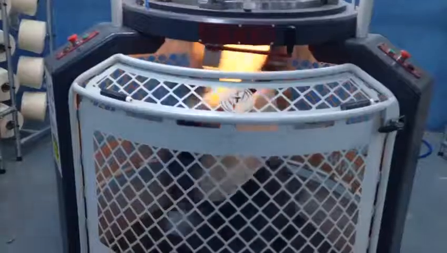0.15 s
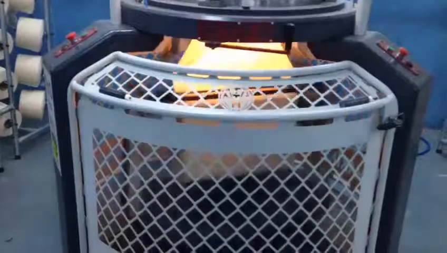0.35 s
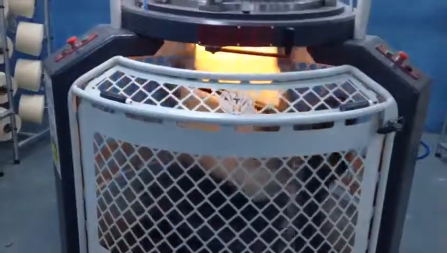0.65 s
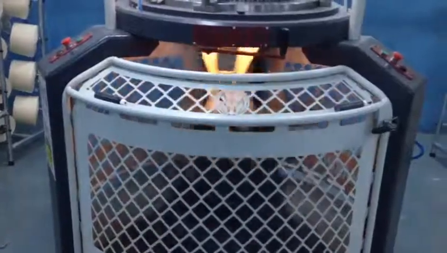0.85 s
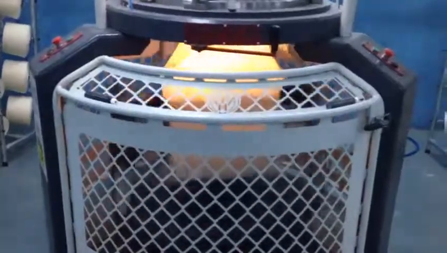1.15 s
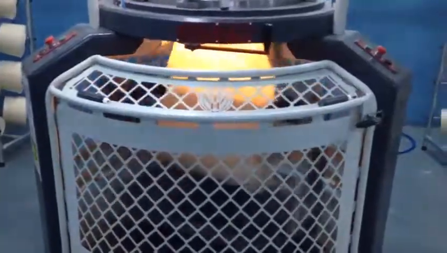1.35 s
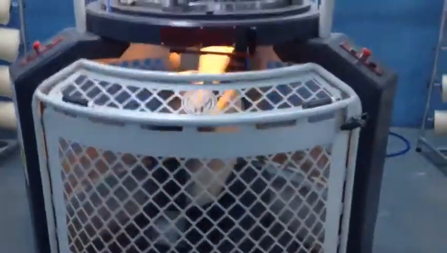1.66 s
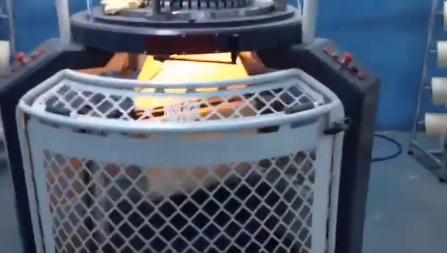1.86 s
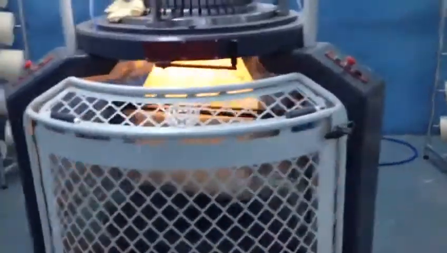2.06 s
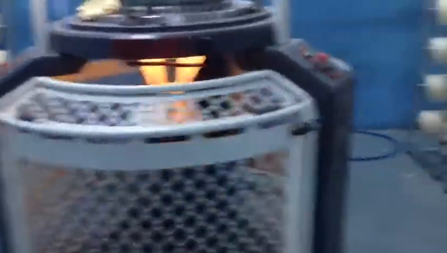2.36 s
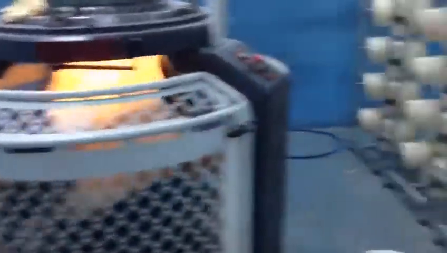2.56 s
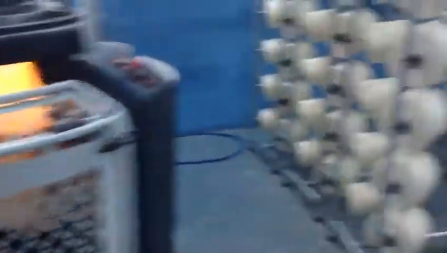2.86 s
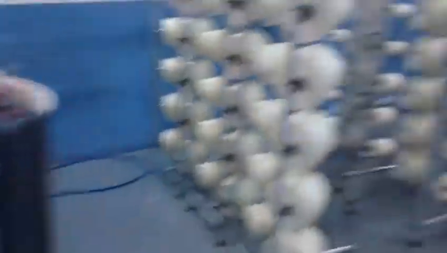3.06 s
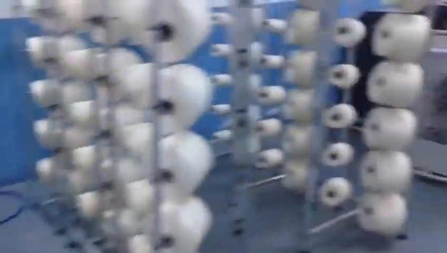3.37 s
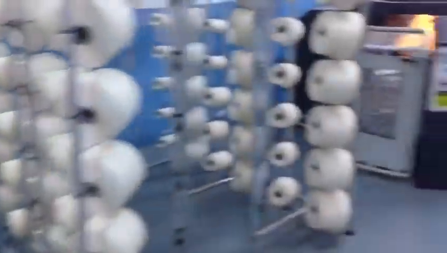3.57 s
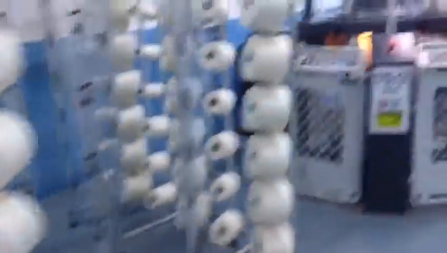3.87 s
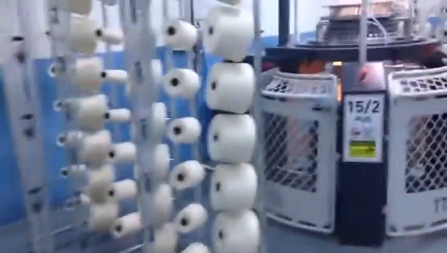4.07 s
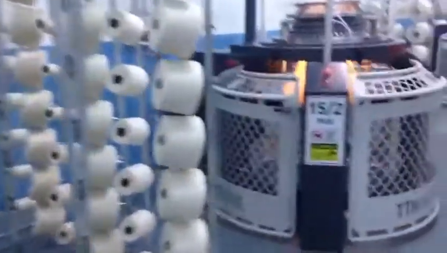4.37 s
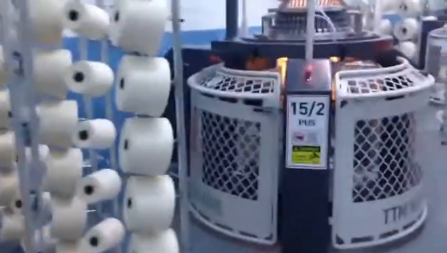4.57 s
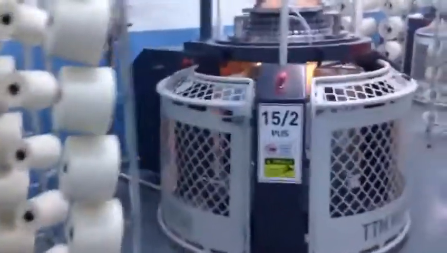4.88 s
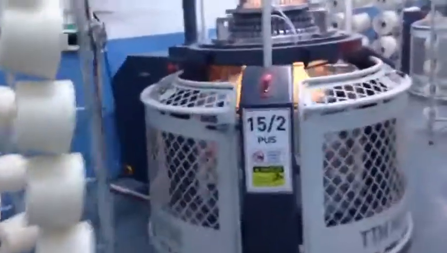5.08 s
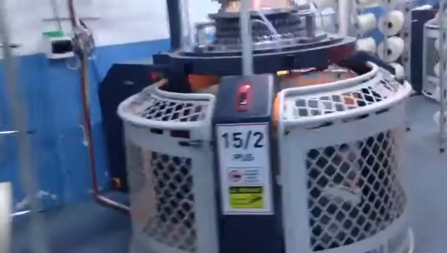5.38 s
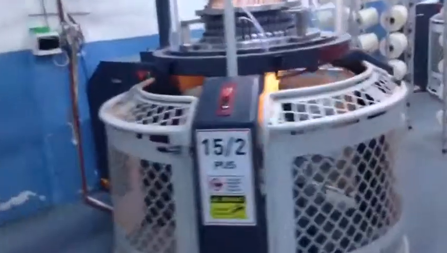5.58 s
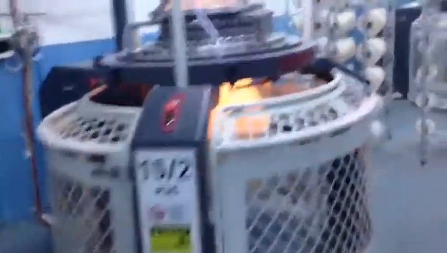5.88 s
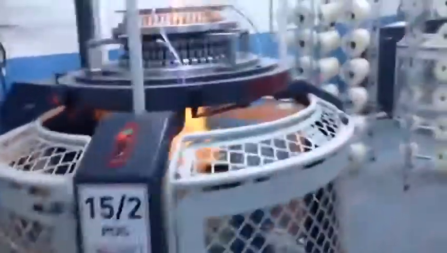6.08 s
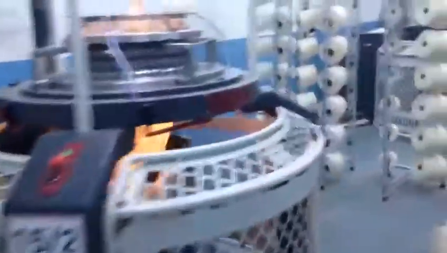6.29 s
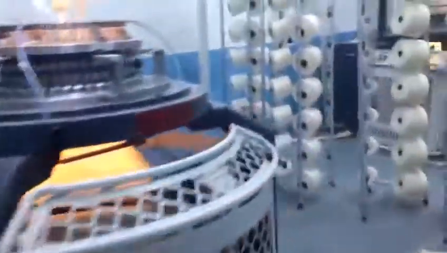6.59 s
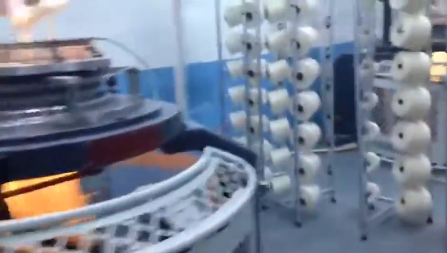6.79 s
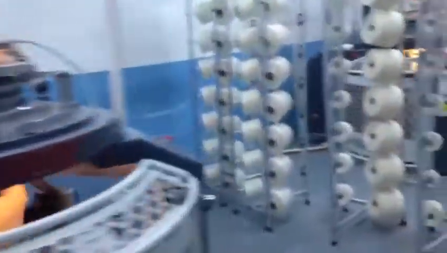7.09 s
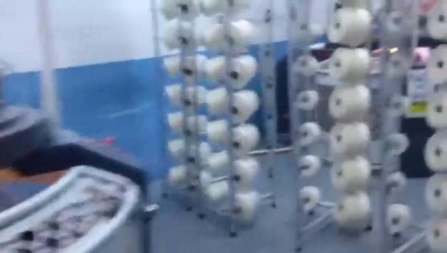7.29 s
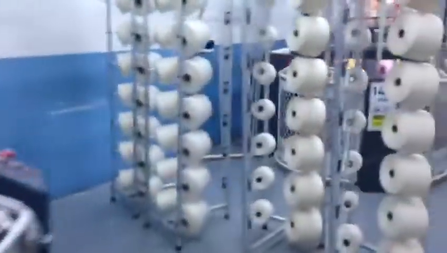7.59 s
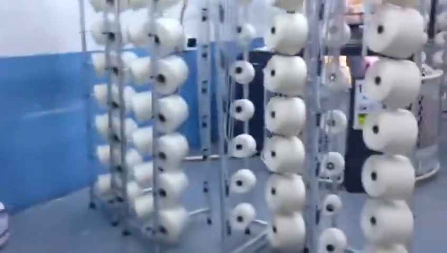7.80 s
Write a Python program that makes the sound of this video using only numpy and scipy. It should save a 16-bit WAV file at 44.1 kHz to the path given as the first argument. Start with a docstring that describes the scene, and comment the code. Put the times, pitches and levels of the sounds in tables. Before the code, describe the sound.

Circular knitting machines run throughout about eight seconds in a large, echoing factory hall, heard from a microphone carried past them. From the start there is a dense, steady roar with a fine, grainy needle rattle and a high hiss, brightest in the first second. Low motor and fan hums swell and sink as the position changes. A mid-pitched gear whine throbs about seven times a second, mixed with wavering tones from the needles, and faint steel pings are scattered through the noise. A nearby air valve gives short, sharp hissing puffs about five times a second, clearest until about 3 seconds, weaker by 5 seconds and then sinking into the background. The low rumble builds gradually. From about 6.5 seconds the hum and whine are a little stronger, and the machines keep running to the end.

```python
"""Circular knitting machines run in a large hall while a phone is carried past them.
Their needles rattle over the cams that lift them and sing at the rate they pass. Motors and fans hum,
drive gears whine and loose steel parts ping. An air valve on the first machine puffs five times
a second, fading as the walker moves on. The sound is mono and sets in after a tenth of a second."""
import sys
import numpy as np
from scipy import signal
from scipy.fft import rfft, irfft, next_fast_len
from scipy.io import wavfile
from scipy.ndimage import uniform_filter1d, map_coordinates

SR = 44100
rng = np.random.default_rng(int(sys.argv[2]) if len(sys.argv) > 2 else 0)


def master(y):
    """Save y as 16-bit WAV."""
    cut = np.clip(np.atleast_2d(y).T, -1, 1)
    pcm = np.round(cut * 32767)  # scale
    wavfile.write(sys.argv[1], SR, pcm.astype(np.int16))


N = 349829
TIME = np.arange(N) / SR

# The needle beds as the walker passes. Each row: time in seconds, rattle in dB, air hiss in dB.
NEEDLE_BED_LEVELS = [(0.1, -25, -28.5), (0.45, -26, -28.5), (0.68, -26.5, -28), (0.88, -28, -30.5),
                     (1.2, -27.5, -30.5), (1.5, -27.5, -30), (2.3, -28.5, -31.5), (2.9, -27.5, -30),
                     (3.45, -28, -29.5), (3.9, -28.5, -33.5), (4.2, -28.5, -33.5), (4.45, -28, -31),
                     (4.95, -29, -33.5), (5.4, -29.0, -32), (5.85, -29, -32.5), (6.6, -29.0, -33.5),
                     (7.3, -28, -33.5), (7.93, -28, -33.5)]
# The hall's five noises, from low to high. Each row: frequency in Hz, relative level in dB.
RUMBLE_SPECTRUM = [(12, -71), (25, -47), (40, -23), (62, -13), (103, -10), (156, -4), (200, -6.5),
                   (248, -16), (280, -13), (360, -27), (620, -120)]
ROAR_SPECTRUM = [(140, -14.5), (240, -3), (306, 0.5), (371, 2), (446, 0.5), (506, -0.9), (715, -1.5),
                 (899, -2), (982, -4), (1400, -16.5), (1820, -48), (3080, -120)]
CLATTER_SPECTRUM = [(800, -36), (1100, -1), (1250, -1), (1500, -1), (2000, -0.5), (2400, -1), (2650, -0.5),
                    (2900, -2), (3300, -8), (4000, -45)]
RATTLE_SPECTRUM = [(2400, -52), (3000, -3), (3300, -1.5), (3700, 0), (4200, 0.5), (4800, -1.5),
                   (5500, -6.5), (6200, -13), (7500, -23.5)]
HISS_SPECTRUM = [(4200, -26), (5300, -1.5), (5900, 0), (7300, -3), (8500, -4.5), (9500, -5), (9800, -7),
                 (10500, -9.5), (11200, -21)]
# A dip near 2800 Hz, deepest beside the first machine. Each row: time in seconds, depth from 0 to 1.
DIP_DEPTHS = [(.1, 0.15), (.5, 0.28), (2.5, 0.34), (3.2, 0.04), (7.93, 0.16)]

# The strong hums' pitches in Hz. Two motors at nearly the same speed give the close pairs.
HUM_PITCHES = [152.3, 168.1, 209.9, 300.4, 304, 451.2, 456]
# The hums in the hall's standing waves. Each row: time in seconds, then a level in dB for each pitch.
HUM_LEVELS = [(0.1, -42, -40, -52, -50, -44, -42, -52), (0.3, -33, -44, -52, -45, -38, -37, -52),
              (0.49, -37, -34, -46, -42, -52, -46, -52), (0.69, -52, -37.5, -35, -39, -47, -36, -52),
              (0.88, -39, -37, -44, -40, -42, -40, -52), (1.08, -39, -42, -45, -42, -43, -48, -54),
              (1.27, -45, -40, -40, -37, -43, -52, -48), (1.47, -43, -46, -52, -35, -46, -38, -52),
              (1.67, -52, -51, -38, -38, -46, -34, -52), (1.86, -52, -52, -42, -40, -43, -32.5, -41),
              (2.06, -44, -42, -52, -40, -52, -41, -52), (2.25, -52, -43, -45, -51, -38, -45, -35),
              (2.45, -47, -34.5, -52, -49, -41, -46, -35), (2.64, -52, -36, -52, -44, -38, -38, -35),
              (2.84, -39, -38, -52, -38, -39, -33, -35), (3.04, -45, -40, -52, -52, -52, -33, -52),
              (3.23, -42, -38, -52, -52, -52, -31, -42), (3.43, -35, -40, -37, -48, -41, -31.5, -36),
              (3.62, -37, -37, -43, -36, -34, -41, -52), (3.82, -41, -33, -40, -41, -42, -40, -52),
              (4.01, -46, -35, -37, -35, -52, -32.5, -43), (4.21, -39, -29, -36, -39, -52, -35, -44),
              (4.41, -33, -32, -41, -38, -44, -46, -47), (4.6, -34, -38, -47, -41, -45, -40, -36),
              (4.8, -39, -37, -39, -43, -52, -50, -41), (4.99, -33, -37, -52, -52, -48, -37, -42),
              (5.19, -43, -52, -39, -43, -44, -38, -36), (5.39, -40, -37, -42, -40, -52, -52, -37),
              (5.58, -43, -37, -34, -52, -42, -39, -47), (5.78, -37, -37, -38, -41, -49, -38, -46),
              (5.97, -40, -43, -36, -52, -52, -41, -40), (6.17, -37, -40, -43, -52, -52, -52, -38),
              (6.36, -40, -52, -32.5, -37, -43, -49, -51), (6.56, -52, -52, -30.5, -32.5, -42, -45, -36),
              (6.76, -43, -43, -31, -37, -40, -52, -41), (6.95, -52, -52, -31, -34, -39, -39, -52),
              (7.15, -33, -38, -30.5, -52, -49, -37, -47), (7.34, -37, -38, -32.5, -39, -45, -37, -52),
              (7.54, -31, -32, -31.5, -42, -34, -31.5, -42), (7.73, -29, -31, -32.5, -52, -52, -34.5, -42),
              (7.93, -33, -30, -34, -52, -43, -41, -44)]
# The weaker hums. Each row: pitch in Hz, level in dB.
QUIET_HUMS = [(71.3, -54), (99.6, -44.5), (139, -45.5), (186, -43.5), (260, -50.5), (311, -44),
              (336.5, -42.5), (412, -41), (467, -42), (521, -46), (608, -45.5), (955, -60), (1005, -46)]

# Needle and gear tones. Each row: time in seconds, then levels in dB for three machines' needles,
# the main gear tone and the three side tones just above it.
WHINE_LEVELS = [(0.1, -50, -40, -35, -38, -31, -38, -48), (0.28, -50, -36, -41, -34, -39, -50, -37),
                (0.46, -48, -41, -39, -35, -42, -50, -42), (0.63, -50, -42, -39, -36, -32, -46, -50),
                (0.81, -41, -48, -41, -34, -35, -38, -50), (0.99, -46, -52, -43, -35.5, -39, -44, -42),
                (1.17, -39, -50, -41, -32, -40, -41, -44), (1.35, -46, -34, -34.5, -41, -40, -46, -44),
                (1.52, -45, -50, -34, -37, -50, -47, -38), (1.7, -42, -50, -45, -33, -48, -44, -39),
                (1.88, -50, -50, -50, -35, -50, -50, -45), (2.06, -50, -52, -50, -37, -40, -50, -46),
                (2.24, -50, -36, -48, -46, -34, -47, -50), (2.41, -48, -33.5, -45, -39, -50, -44, -50),
                (2.59, -41, -35, -42, -35, -42, -47, -50), (2.77, -40, -40, -44, -33, -39, -50, -50),
                (2.95, -42, -50, -37, -34.5, -46, -44, -44), (3.13, -32, -50, -46, -52, -50, -47, -52),
                (3.3, -50, -50, -50, -42, -46, -47, -46), (3.48, -39, -40, -50, -46, -38, -39, -45),
                (3.66, -40, -34, -52, -44, -45, -47, -51), (3.84, -38, -35, -47, -50, -37, -37, -47),
                (4.01, -50, -52, -46, -38, -38, -46, -47), (4.19, -43, -45, -50, -38, -44, -43, -50),
                (4.37, -48, -35, -48, -43, -50, -50, -50), (4.55, -50, -37, -46, -41, -46, -48, -50),
                (4.73, -50, -32, -45, -33, -50, -47, -45), (4.9, -50, -44, -50, -37, -50, -45, -43),
                (5.08, -45, -35, -50, -36, -42, -36, -50), (5.26, -43, -43, -55, -50, -43, -44, -49),
                (5.44, -43, -37, -47, -44, -52, -47, -48), (5.62, -41, -41, -50, -32, -52, -39, -50),
                (5.79, -49, -36, -50, -44, -50, -37, -48), (5.97, -43, -32.5, -52, -44, -42, -38, -42),
                (6.15, -52, -37, -52, -44, -46, -38, -45), (6.33, -45, -32.5, -45, -50, -33, -35, -41),
                (6.51, -50, -48, -42, -31, -42, -43, -50), (6.68, -50, -40, -50, -31, -50, -39, -45),
                (6.86, -38, -36, -54, -39, -39, -28, -44), (7.04, -40, -40, -50, -35, -35, -32, -47),
                (7.22, -49, -38, -45, -39, -36, -45, -40), (7.4, -49, -45, -50, -42, -49, -37, -50),
                (7.57, -36, -51, -50, -42, -45, -44, -50), (7.75, -40, -35, -52, -32, -36, -39, -48),
                (7.93, -50, -39, -50, -33, -29, -33, -44)]
# Echoes loosen the throb away from the gearbox. Each row: time in seconds, phase drift in radians.
GEAR_DRIFT = [(.1, .13), (1.15, .15), (1.5, 0.7), (6.2, 0.46), (6.6, .2), (7.93, .2)]
# Echoes pull the side tones out of step. Each row: time in seconds, basic phase shift in cycles.
GEAR_SPREAD = [(.1, 0), (1.2, 0), (1.5, .15), (2.05, -.38), (4.2, -.33), (5.2, .1), (6.4, .35), (6.85, .16),
               (7.3, .32), (7.65, .6)]
# How fast needles pass a cam, in Hz, for each of three machines.
NEEDLE_PITCHES = [763.3, 826.3, 878.8]
# One list of overtones per machine. Each row: multiple of the pitch, dB against the main tone.
OVERTONES = [
    [(2, -11)],
    [(2, -9)],
    [(2, -5), (4, -9)],
]

# The nearby air puffs. Each row: start in seconds, level of the jet's body in dB, of its edge in dB.
# The bright edge travels in a beam, so its level follows the way the walker faces.
NEAR_PUFFS = [(0.202, -28, -26.5), (0.395, -25, -27.5), (0.588, -31, -28.5), (0.781, -33, -31),
              (0.974, -31, -30), (1.166, -43, -29), (1.359, -36, -28), (1.552, -30.0, -29),
              (1.745, -31, -27), (1.938, -32, -28.5), (2.131, -30, -29), (2.324, -29, -30),
              (2.517, -44, -29), (2.71, -42, -34), (2.903, -29, -31), (3.095, -38.0, -35),
              (3.288, -30, -34), (3.481, -30, -35), (3.674, -37, -33), (3.867, -45, -37), (4.06, -40, -34),
              (4.272, -31, -35), (4.44, -31, -36), (4.66, -37, -38)]
# The air jet's body and edge. Each row: frequency in Hz, relative level in dB.
BODY_SPECTRUM = [(2500, -31), (3400, -6.5), (4300, -3), (5200, -2.5), (5800, -9), (6800, -36)]
EDGE_SPECTRUM = [(5000, -33), (5800, -5), (6500, -2), (7700, -7), (8700, -8), (10400, -11.5), (11500, -28)]


def amp(db):
    """Turn decibels into a gain."""
    return 10 ** (np.asarray(db) / 20)


def unit(x):
    """Scale x to an average (rms) level of 1."""
    return x / np.sqrt(np.mean(x ** 2) + 1e-20)


def curves(rows):
    """Draw straight lines through each column after the time, one value per sample."""
    seconds, *columns = np.transpose(rows)
    return [np.interp(TIME, seconds, column) for column in columns]


def swells(rows):
    """Turn columns of dB into gain curves: overlapping waves swell and fade."""
    return curves([(seconds, *amp(levels_db)) for seconds, *levels_db in rows])


def wobble(rate):
    """A smooth curve through `rate` random points a second."""
    coarse = TIME[::64]
    points = rng.standard_normal(int(N * rate / SR) + 4)
    return np.interp(TIME, coarse, map_coordinates(points, [coarse * rate]))


def filtered(x, response):
    """Scale each frequency in x by the gain response(hz)."""
    size = next_fast_len(N + 8192)
    return irfft(rfft(x, size) * response(np.fft.rfftfreq(size, 1 / SR)), size)[..., :N]


def coloured(x, spectrum):
    """Shape x with a spectrum table and scale it to level 1."""
    row_hz, db = np.transpose(spectrum)
    return unit(filtered(x, lambda hz: amp(np.interp(np.log(hz + 1), np.log(row_hz + 1), db))))


def patchy(x, depth_db, window=512, bands=6, frames=10):
    """Make random patches of x, a few bands wide and frames long, louder or softer."""
    grid = signal.stft(x, nperseg=window)[2]
    patches = uniform_filter1d(rng.standard_normal(grid.shape), size=bands, axis=0)
    patches = uniform_filter1d(patches, size=frames, axis=1)
    return signal.istft(grid * amp(depth_db * unit(patches)), nperseg=window)[1][:N]


def steel_ticks():
    """Thousands of steel contacts of uneven strength merge into a grainy noise."""
    return rng.standard_normal(N) * amp(1.35 * rng.standard_normal(N))


def machine_noise():
    """All the machines blend into an echoing rumble, roar, clatter, rattle and hiss."""
    def layer(level_db, source, spectrum, patch_db):
        return amp(level_db) * coloured(patchy(source, patch_db), spectrum)

    rattle_db, hiss_db = curves(NEEDLE_BED_LEVELS)
    clatter_db = -28.5 + 0.93 * (rattle_db - rattle_db.mean())  # shares part of the rattle's swings
    rumble_db = -33.5 + 0.48 * TIME  # grows deeper into the hall
    surge_db = 0.32 * wobble(8)  # the nearest cams load unevenly
    return (layer(rumble_db + 0.79 * wobble(8.1), rng.standard_normal(N), RUMBLE_SPECTRUM, patch_db=2.05)
            + layer(-26 + 0.23 * wobble(7.8), rng.standard_normal(N), ROAR_SPECTRUM, patch_db=1.05)
            + layer(clatter_db + 0.34 * wobble(6.4), steel_ticks(), CLATTER_SPECTRUM, patch_db=1.67)
            + layer(rattle_db + surge_db, steel_ticks(), RATTLE_SPECTRUM, patch_db=1.07)
            + layer(hiss_db + surge_db, steel_ticks(), HISS_SPECTRUM, patch_db=1.5))


def standing_waves(x):
    """Echoes form loud and quiet spots, so narrow bands rise and sink as the walker moves."""
    return unit(patchy(x, depth_db=1.8, window=2048, bands=2, frames=6)) * np.std(x)


def steel_pings(count, base_db):
    """Loose steel parts ring briefly all over the hall."""
    when, pitch, size, life = rng.random((count, 4)).T[:, :, None]
    t = np.arange(SR // 6) / SR
    hz = 1050 * 3 ** pitch
    ring_s = .15 + .2 * life  # time to fall by 60 dB
    fade_in = 1 - np.exp(-t / .015)
    rings = np.sin(2 * np.pi * hz * t) * amp(-60 * t / ring_s) * fade_in
    rings *= amp(base_db - 3 * pitch + 8 * size)
    places = (when * N).astype(int) + np.arange(len(t))
    return np.bincount(places.ravel(), rings.ravel(), N + SR)[:N]  # add each ring at its place


def tone(hz, drift, flutter_db, cycle=None):
    """A pure tone whose phase drifts (in radians) and level flutters as echoes shift around the walker."""
    if cycle is None:
        cycle = rng.random()
    phase = 2 * np.pi * (hz * TIME + cycle) + drift * wobble(4)
    return np.sqrt(2) * amp(flutter_db * wobble(5)) * np.sin(phase)


def motor_hums():
    """Motors and fans hum; the strong hums swell and fade along the walk."""
    strong = sum(gain * tone(hz, drift=0.3, flutter_db=0.5)
                 for hz, gain in zip(HUM_PITCHES, swells(HUM_LEVELS)))
    return strong + sum(amp(db) * tone(hz, drift=.9, flutter_db=2.5) for hz, db in QUIET_HUMS)


def gear_whine():
    """Gear teeth meet at a steady rate and bind once per shaft turn, adding side tones that throb."""
    tooth_hz, shaft_hz, first_bind_s = 897.4, 7.4, .183
    main, first, second, third = swells(WHINE_LEVELS)[3:]
    lower = first * amp(-7)  # the side tone below the main one
    drift, spread = curves(GEAR_DRIFT)[0], curves(GEAR_SPREAD)[0]
    whine = np.zeros(N)
    for side, gain in enumerate([lower, main, first, second, third], start=-1):
        cycle = -side * shaft_hz * first_bind_s - spread * (side - 1) ** 2
        whine += gain * tone(tooth_hz + side * shaft_hz, drift, flutter_db=.5, cycle=cycle)
    return whine


def needle_song():
    """Needles pass a cam at a steady rate, giving each machine a note with overtones."""
    song = np.zeros(N)
    for hz, gain, overtones in zip(NEEDLE_PITCHES, swells(WHINE_LEVELS)[:3], OVERTONES):
        note = tone(hz, drift=0.4, flutter_db=1.1)
        note += sum(amp(db) * tone(multiple * hz, drift=2.15, flutter_db=3) for multiple, db in overtones)
        song += gain * note
    return song


def air_valve():
    """Each puff of air starts, swells, snaps shut at its loudest and dies away in the hall."""
    period_s, leak_s = .1929, .015  # a little air leaks before the valve opens
    open_s, shut_s, creep_s, snap_s = .001, .033, .003, .0015  # when it opens and shuts, and how fast
    t = np.arange(int(period_s * SR)) / SR - leak_s
    opened = (1 + np.tanh((t - open_s) / creep_s / 2)) / 2
    shut = (1 + np.tanh((t - shut_s) / snap_s / 2)) / 2
    jet_power = opened * (1 - shut) * (1 + .6 * (t / shut_s) ** 2)
    echo_power = .3 * shut * np.exp(-(t - shut_s) / .048)
    shape = np.sqrt(jet_power + echo_power)

    puffs, last_near_s = list(NEAR_PUFFS), NEAR_PUFFS[-1][0]
    for start_s in np.arange(last_near_s + period_s, N / SR, period_s):  # ever further off
        far_db = np.array([-36, -37.5]) - 0.9 * (start_s - last_near_s)  # body and edge
        puffs.append((start_s, *(far_db + 3 * rng.standard_normal(2))))
    gains = np.zeros((2, N + SR))
    for start_s, *levels_db in puffs:
        start = round((start_s - leak_s) * SR)
        gains[:, start:start + len(t)] = amp(levels_db)[:, None] * shape
    body = gains[0, :N] * coloured(rng.standard_normal(N), BODY_SPECTRUM)
    edge = gains[1, :N] * coloured(rng.standard_normal(N), EDGE_SPECTRUM)
    return body + edge


def scene():
    """Everything meets at one microphone, which feeds both channels."""
    hall = standing_waves(machine_noise()) + steel_pings(count=350, base_db=-35)
    dip_band = filtered(hall, lambda hz: np.exp(-((hz - 2800) / 350) ** 2))
    hall -= curves(DIP_DEPTHS)[0] * dip_band
    mono = hall + motor_hums() + gear_whine() + needle_song() + air_valve()
    return np.array([mono, mono])


def record(dry):
    """The phone opens its input after a short silence and cuts off the highest treble."""
    start_s, top_hz = .1005, 10750
    opened = dry * np.clip((TIME - start_s) / .0005, 0, 1)
    return filtered(opened, lambda hz: np.clip((top_hz - hz) / 250, 0, 1) ** 2)


dry = scene()
out = record(dry)
master(out)
```